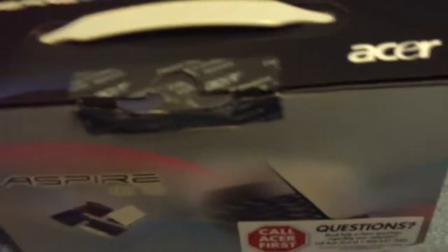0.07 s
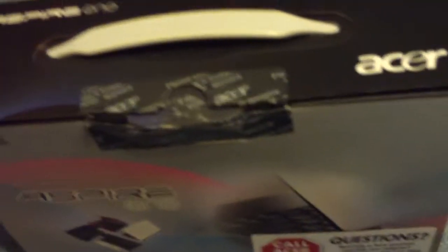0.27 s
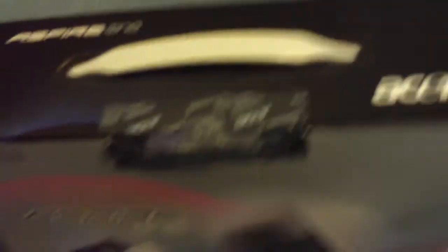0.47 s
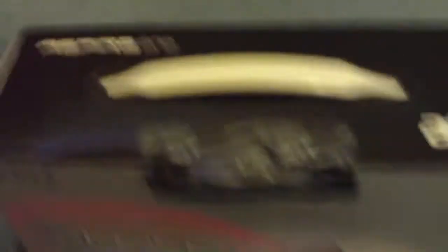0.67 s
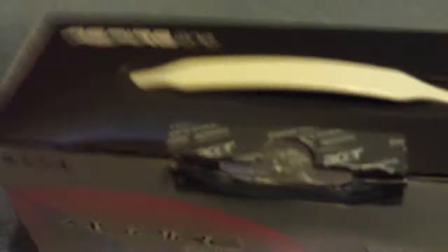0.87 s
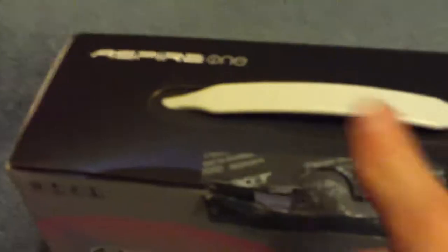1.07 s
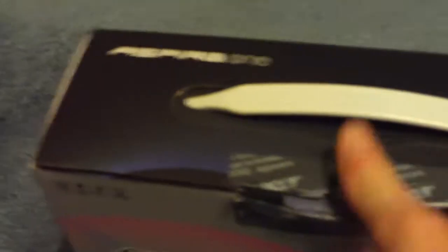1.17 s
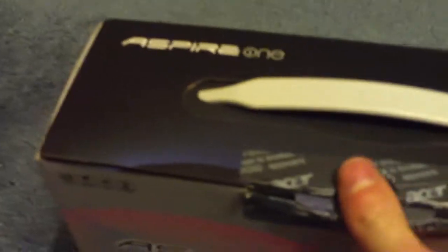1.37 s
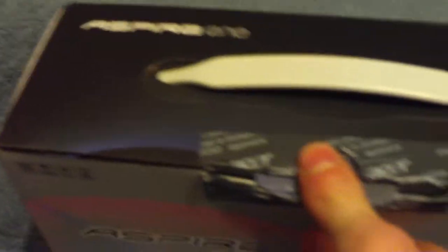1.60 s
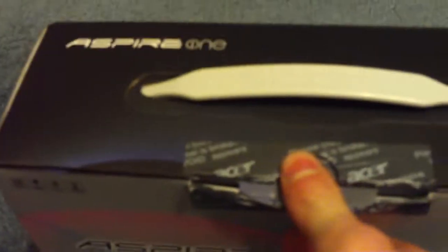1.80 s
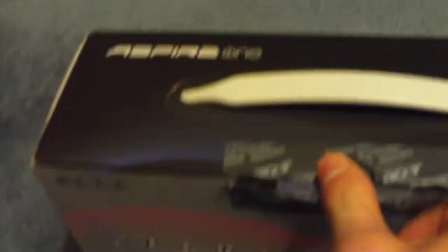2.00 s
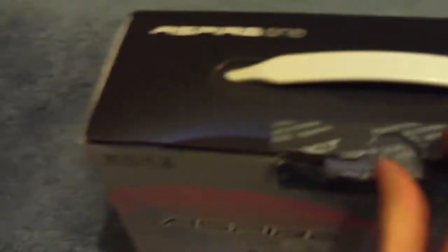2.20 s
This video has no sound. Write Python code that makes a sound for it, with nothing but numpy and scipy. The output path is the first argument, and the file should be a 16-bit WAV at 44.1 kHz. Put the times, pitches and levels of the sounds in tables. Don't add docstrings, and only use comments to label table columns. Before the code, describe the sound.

Plastic clicks and creaks from a gripped device: faint ticks at 0.2 seconds, a loud resonant snap at 0.54, then a dense clattering cluster from 0.7 to 0.9. From about 1.25 to 2.2 seconds, much softer, duller thumb taps, picks and short rubs on a taped cardboard box. Quiet room, close hand-held microphone, constant hiss, low hum, and handling rumble strongest near 0.7.

```python
import sys
import numpy as np
from scipy import signal
from scipy.io import wavfile
from scipy.ndimage import uniform_filter1d

SR = 44100
rng = np.random.default_rng(int(sys.argv[2]) if len(sys.argv) > 2 else 0)


def gain_from_db(level_db):
    decades = np.asarray(level_db, float) / 20
    return 10 ** decades


def dump(signal):
    limited = np.clip(np.atleast_2d(signal).T, -1, 1)
    pcm = np.round(limited * 32767).astype(np.int16)
    wavfile.write(sys.argv[1], SR, pcm)


N = 99225


def rms_one(x):
    return x / np.sqrt(np.mean(x ** 2) + 1e-20)


def drift(rate_hz):
    r = np.exp(-2 * np.pi * rate_hz / SR)
    noise = rng.standard_normal(N + SR)
    return rms_one(signal.lfilter([1], [1, -2 * r, r * r], noise)[SR:])


def ring(force, mode_hz, t60_s):
    r, w = gain_from_db(-60 / (t60_s * SR)), 2 * np.pi * mode_hz / SR
    return signal.lfilter([0, np.sin(w)], [1, -2 * r * np.cos(w), r * r], force + 1e-18)


def body(force, colour_hz, modes, octaves, spread_db):
    sound = 0
    for mode_hz, level_db, t60_s in modes:
        near_db = -6 * (np.log2(mode_hz / colour_hz) / octaves) ** 2
        gain_db = level_db + near_db + spread_db * rng.standard_normal()
        sound = sound + gain_from_db(gain_db) * ring(force, mode_hz, t60_s)
    return sound


def taps(rows, modes, octaves, snap_cycles):
    out, size = np.zeros(N + SR), SR // 6
    t = np.arange(size) / SR
    for start_s, peak_db, colour_hz, ring_db in rows:
        turns = t * colour_hz
        cycles = snap_cycles * (colour_hz / 1000) ** 0.6
        swell = (turns / cycles * np.exp(1 - turns / cycles)) ** 2
        snap = np.sin(2 * np.pi * turns) * swell
        rung = body(snap, colour_hz, modes, octaves, spread_db=1.5)
        sound = snap + gain_from_db(ring_db) * rung / np.abs(rung).max()
        i = int(start_s * SR)
        out[i:i + size] += gain_from_db(peak_db) * sound / np.abs(sound).max()
    return out[:N]


def rubs(rows, modes, octaves, slips_per_s, uneven_db):
    out, size = np.zeros(N + SR), SR // 3
    t = np.arange(size) / SR
    for start_s, length_s, level_db, colour_hz in rows:
        chance, sign, strength = rng.random((3, size))
        slips = (chance < slips_per_s / SR) * np.sign(sign - 0.5)
        slips = slips * gain_from_db(-uneven_db * np.log(strength + 0.03))
        soft = signal.butter(2, min(2.32 * colour_hz, 9000), fs=SR, output="sos")
        swell = np.sin(np.pi * np.clip(t / length_s, 0, 1)) ** 0.5
        sound = body(signal.sosfilt(soft, slips) * swell, colour_hz, modes, octaves, spread_db=0.5)
        rms = np.sqrt(np.sum(sound ** 2) / (length_s * SR) + 1e-20)
        i = int(start_s * SR)
        out[i:i + size] += gain_from_db(level_db) * sound / rms
    return out[:N]


# mode_hz [Hz], level_db [dB], t60_s [s]
CASE_MODES = [(422.5, 10, 0.066), (610, -36.5, 0.18), (794, 3, 0.037), (940, -3.5, 0.032), (1092, 1, 0.016),
              (1471, -2.5, 0.041), (1717, 2.5, 0.01), (2420, 1, 0.0083), (2710, -12, 0.011),
              (3000, -1.5, 0.018), (3620, -3, 0.009), (3750, -6.5, 0.033), (4164, -3, 0.023),
              (5143, -13, 0.052)]
# [dB, ring re snap]
CASE_CLICKS = [(.2110, -21, 3000, 8), (.2130, -24, 1010, 1), (.2135, -31, 5040, -8), (.2150, -26, 2640, -1),
               (.2330, -25.5, 2680, 12), (.5398, -6.5, 1070, 11), (.5395, -20.5, 1650, -3),
               (.5420, -28.5, 410, 36.5), (.5455, -16.5, 722, -6), (.5855, -30, 1450, -17),
               (.7190, -13, 1080, 0.5), (.7255, -29, 805, -7), (.7738, -21.5, 2990, -1),
               (.7735, -14, 1170, -12), (.7900, -32, 1450, -1), (.7945, -26, 1500, 9),
               (.8035, -21, 1500, 6), (.8100, -7, 1450, -12.5), (.8130, -14.5, 1080, -3),
               (.8145, -13.5, 3430, -14), (.8435, -28, 3350, -15), (.8685, -17, 2620, -11),
               (.8810, -18, 1730, -5.5), (.8750, -17, 2140, -18), (.8800, -12.5, 2500, -13.5),
               (.8795, -22, 4800, -31), (.8840, -19.5, 1140, -15.5), (.9085, -39, 794, -3)]
# start_s [s], length_s [s], level_db [dB], colour_hz [Hz]
CASE_CREAKS = [(.21, .03, -45.5, 890), (.375, 0.09, -48, 2500), (.397, 0.021, -36.5, 3900),
               (.398, 0.015, -40, 1390), (.438, 0.015, -47, 3050), (.475, .02, -42.5, 1200),
               (.55, 0.037, -38, 910), (.615, 0.051, -38.5, 1300), (.73, 0.034, -34.5, 1300),
               (.780, 0.04, -31, 1500), (.811, 0.025, -38.5, 3000), (.82, 0.077, -38.5, 1490),
               (.866, 0.014, -34, 2910), (.885, 0.052, -43.5, 900), (.80, 0.068, -42, 400),
               (.872, 0.01, -35, 5000), (.625, .055, -43.5, 3000), (.215, 0.027, -43.5, 430)]


def plastic_case():
    clicks = taps(CASE_CLICKS, CASE_MODES, octaves=0.72, snap_cycles=0.85)
    creaks = rubs(CASE_CREAKS, CASE_MODES, octaves=0.6, slips_per_s=2000, uneven_db=3)
    return clicks + creaks


# mode_hz [Hz], level_db [dB], t60_s [s]
BOX_MODES = [(140, -17.5, 0.047), (226, -3.5, 0.062), (294, -3, 0.039), (400, 3, 0.026), (660, -5.5, 0.014),
             (730, 5.5, .035), (863, 9, 0.016), (987, 14, 0.023), (1500, -11.5, 0.015), (1630, -10, .02)]
# [dB, ring re snap]
TAPE_PICKS = [(1.257, -39, 950, 11), (1.279, -34.5, 235, -3), (1.398, -36, 520, -1), (1.4275, -28, 695, -6),
              (1.424, -28.5, 277, 17), (1.448, -34, 880, 0), (1.4535, -25, 800, 2), (1.463, -31, 684, 6),
              (1.4545, -28.5, 1600, 1), (1.567, -29, 280, -3), (1.632, -34.5, 333, -6),
              (1.566, -25.5, 930, 0), (1.5765, -26, 895, -6), (1.590, -28.5, 850, 6), (1.6285, -31, 840, 2),
              (1.643, -29, 700, -6), (1.770, -28.5, 970, -2), (1.800, -21, 730, 1), (1.801, -27.5, 1530, 4),
              (1.801, -21, 245, -16.5), (1.956, -32, 756, -9), (1.959, -25.5, 256, 0),
              (2.043, -33.5, 263, 6), (2.144, -27, 247, -7), (2.173, -33, 220, -5)]
# start_s [s], length_s [s], level_db [dB], colour_hz [Hz]
TAPE_RUBS = [(1.37, 0.096, -38.5, 400), (1.425, 0.051, -38.5, 545), (1.49, 0.11, -45, 200),
             (1.55, 0.045, -37.5, 900), (1.57, 0.069, -42, 250), (1.62, .05, -38, 350),
             (1.81, 0.046, -40, 148), (1.91, 0.039, -43, 950), (1.98, 0.024, -46, 910),
             (1.955, 0.015, -34.5, 300), (2.03, .2, -51, 250)]


def taped_box():
    picks = taps(TAPE_PICKS, BOX_MODES, octaves=1.3, snap_cycles=1.5)
    thumb = rubs(TAPE_RUBS, BOX_MODES, octaves=1, slips_per_s=980, uneven_db=4)
    return picks + thumb


# freq_hz [Hz], density_db [dB per Hz]
HISS_SPECTRUM = [(80, -5), (130, 0.5), (180, -1.5), (530, -5), (3000, -11.5), (4500, -14.5), (6000, -24.5),
                 (7400, -37.5)]


def hiss():
    out, white = 0, rng.standard_normal((2, N))
    edges_hz = 70 * 2 ** np.arange(0, 7.1, 1 / 3)
    freq_hz, density_db = np.transpose(HISS_SPECTRUM)
    for k, (low_hz, high_hz) in enumerate(zip(edges_hz, edges_hz[1:])):
        sos = signal.butter(2, [low_hz, high_hz], "band", fs=SR, output="sos")
        band = signal.sosfilt(sos, white[k % 2])
        band_db = np.interp(np.log(low_hz * high_hz) / 2, np.log(freq_hz), density_db)
        out = out + band * gain_from_db(band_db + 0.67 * drift(4.1))
    return gain_from_db(-41.5) * rms_one(out)


# time_s [s], level_db [dB]
HAND_SHAKE = [
    (0.0, -37),
    (0.26, -38.5),
    (0.27, -43),
    (0.68, -31.5),
    (0.96, -42.5),
    (2.25, -41),
]


def rumble():
    time_s, level_db = np.transpose(HAND_SHAKE)
    sos = signal.butter(2, [15, 83], "band", fs=SR, output="sos")
    low = rms_one(signal.sosfilt(sos, rng.standard_normal(N + SR))[SR:])
    shake_db = np.interp(np.arange(N) / SR, time_s, level_db) - 7.0
    return low * gain_from_db(shake_db + 4.4 * drift(18))


def hum():
    pitch_hz = 59.8 + 0.3 * drift(2)
    level_db = -47.5 + drift(2)
    return gain_from_db(level_db) * np.sin(2 * np.pi * np.cumsum(pitch_hz) / SR)


def gate(x):
    hz, _, z = signal.stft(x, SR, "cosine", nperseg=1408, noverlap=704)
    power = uniform_filter1d(np.abs(z) ** 2, size=3, axis=0)
    loud_db = 10 * np.log10(power[hz > 400].sum(axis=0) + 1e-20)
    excess_db = np.maximum(loud_db - np.median(loud_db), 0)
    over_db = signal.lfilter([1], [1, -0.6], excess_db)
    wander = rng.standard_normal((len(hz) // 10 + 1, z.shape[1]))
    wander = np.repeat(wander, 10, axis=0)[:len(hz)]
    limit_db = -86.5 + 0.55 * np.minimum(over_db, 14) + 7.5 * wander
    muted = (hz[:, None] > 4200) & (power < gain_from_db(limit_db) ** 2)
    gain = np.where(muted, gain_from_db(-29.5), 1)
    return signal.istft(z * gain, SR, "cosine", nperseg=1408, noverlap=704)[1][:N]


def scene():
    return (plastic_case() + taped_box() + hiss() + rumble() + hum())[None]


def band_limit(x):
    return signal.sosfilt(signal.butter(12, 7450, fs=SR, output="sos"), x)


def record(dry):
    steep = signal.cheby2(14, 60, 7850, fs=SR, output="sos")
    mix = signal.sosfilt(steep, gate(dry[0]))
    return band_limit(mix[None])


dry = scene()
out = record(dry)
dump(out)
```